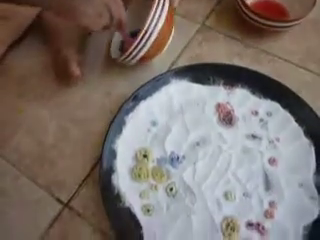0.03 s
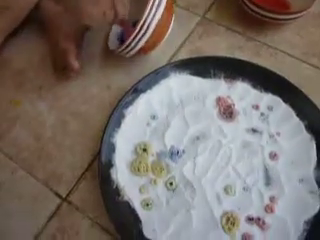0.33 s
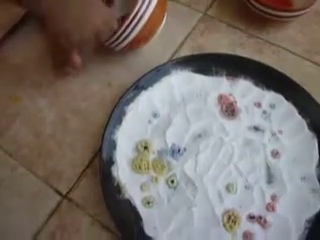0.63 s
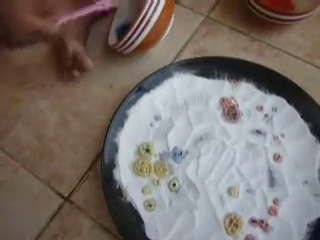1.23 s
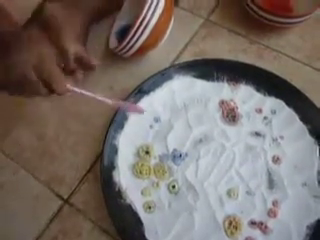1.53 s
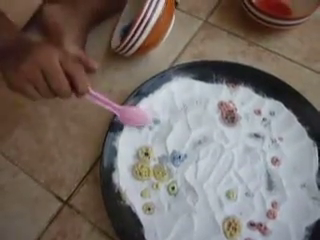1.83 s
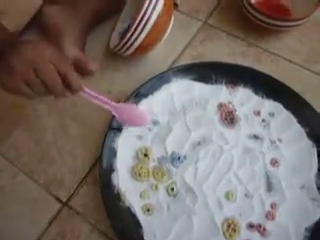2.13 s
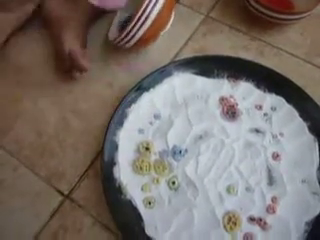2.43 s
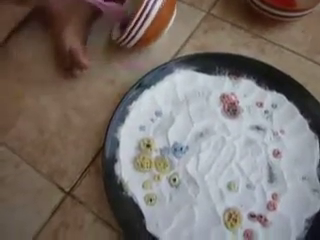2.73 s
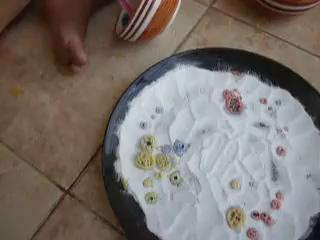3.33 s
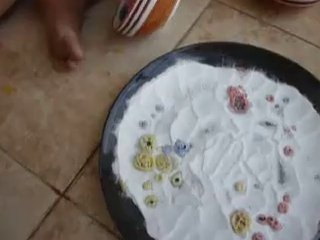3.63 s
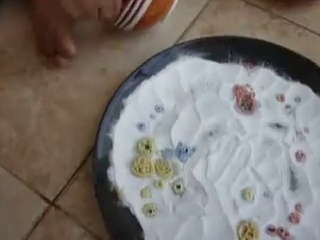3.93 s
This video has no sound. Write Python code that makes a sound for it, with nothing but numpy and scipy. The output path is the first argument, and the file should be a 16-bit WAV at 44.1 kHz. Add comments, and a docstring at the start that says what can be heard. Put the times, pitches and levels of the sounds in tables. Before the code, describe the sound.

A plastic spoon rubs faintly around a bowl of water at the start, with a few soft squeaks. Steady hiss, a wavering hum and dull room noise fill a quiet room, and two tiny clicks come near the end.

```python
"""Spoon and bowl in a quiet tiled room

A plastic spoon rubs faintly round a bowl of water, exciting its resonances; three soft squeaks
and a tiny tick follow. High hiss, a wavering hum and dull room noise run throughout; hiss and
room noise drop a little after 2.7 s. The mono recorder cuts three notches in the treble,
removes the top, clicks once and adds a DC offset."""
import sys
import numpy as np
from scipy.fft import rfft, irfft
from scipy.io import wavfile

SR = 44100
rng = np.random.default_rng(int(sys.argv[2]) if len(sys.argv) > 2 else 0)


def to_wav(sig):
    """Store sig (one row per channel, or 1-D mono) as 16-bit WAV at the path in sys.argv[1].

    Samples outside -1..1 are clipped; the rate is SR.
    """
    pcm = np.clip(np.atleast_2d(sig), -1, 1) * 32767
    pcm = np.round(pcm).astype(np.int16)
    wavfile.write(sys.argv[1], SR, pcm.T)  # frames by channels


N = 176400

# bowl resonances: f/Hz, width/Hz, relative level/dB
BOWL_MODES = [(530, 54, 2), (777, 89, 1.5), (1200, 97, -7.5), (1575, 100, -2.5), (1940, 97, -1.5),
              (2200, 160, -4), (2490, 190, -5), (3670, 240, -7.5)]
# squeaks: t/s, length/s, f/Hz, width/Hz, level/dB
SQUEAK_NOTES = [(0.449, 0.034, 900, 47, -49.5), (0.462, 0.042, 790, 44, -51), (1.54, 0.1, 1245, 12, -58)]
# hiss spectrum: f/Hz, relative level/dB
HISS_SPECTRUM = [(1000, -9.5), (2600, -12), (3700, -4.5), (5100, -1), (5900, 1), (6350, 2), (7000, -6.5),
                 (7350, -6), (7750, -15.5), (8400, -24), (8650, -33.5), (8900, -31)]
# hiss envelope: t/s, level/dB
HISS_ENVELOPE = [(0, -53.5), (.35, -54), (.58, -54.5), (.9, -53), (1.06, -54), (1.2, -52.8), (1.62, -54.5),
                 (1.7, -56.5), (1.85, -55), (2.3, -54.5), (2.64, -55), (2.75, -58), (3.28, -59.5),
                 (3.7, -59), (4, -58.5)]
# lower hum line: t/s, level/dB
HUM_LOW_ENVELOPE = [(0, -57), (.44, -57), (.52, -66), (0.619, -53), (.85, -77), (1.05, -55.5), (1.24, -61),
                    (1.4, -52.5), (1.76, -57), (1.95, -64.5), (2.28, -63), (2.951, -57), (4, -74.5)]
# upper hum line: t/s, level/dB
HUM_HIGH_ENVELOPE = [(0, -63.5), (1.1, -64), (1.6, -62), (1.76, -56), (1.88, -66.5), (2, -57), (2.2, -57),
                     (2.45, -67), (3.3, -67.5), (4, -68.5)]
# room noise spectrum: f/Hz, relative level/dB
ROOM_SPECTRUM = [(25, -25.5), (45, -23.5), (65, -7.5), (110, -6), (150, 1), (250, 0.5), (400, -4),
                 (560, -5.5), (950, -10.5), (1400, -12.5), (2400, -17.5), (4000, -32), (9000, -49)]
# room noise envelope: t/s, level/dB
ROOM_ENVELOPE = [(0, -50.5), (.45, -51), (.6, -50.5), (1.5, -50.5), (2.6, -51.5), (2.85, -53), (3.5, -53),
                 (4, -52.5)]
# recorder notches: f/Hz, width/Hz
TREBLE_NOTCHES = [(3010, 625), (4390, 1570), (5405, 290)]
# recorder DC offset: t/s, offset/full scale
DC_OFFSET = [(0, -.035), (2.699, -.035), (2.704, -.0295), (4, -.0295)]


def stir(start_s=0.013, peak_s=0.18, end_s=0.62, level_db=-53.5, rough_db=0.5):
    """Spoon friction drives the bowl's resonances; power follows the pressure."""
    spectrum = sum(undb(db) * resonance(hz, width_hz) * white_spectrum()
                   for hz, width_hz, db in BOWL_MODES)
    rub = unit(irfft(spectrum, N))
    pressure = curve([(start_s, 0), (peak_s, 1), (end_s, 0)])
    return rub * np.sqrt(pressure) * undb(level_db + rough_db * walk(49.6))


def squeaks():
    """Short, faint notes of unsteady pitch."""
    t, out = np.arange(N) / SR, np.zeros(N)
    for start_s, length_s, hz, width_hz, db in SQUEAK_NOTES:
        swell = np.sin(np.pi * np.clip((t - start_s) / length_s, 0, 1))
        out += undb(db) * swell * tone(hz + width_hz / 2 * walk(140))
    return out


def tick(start_s, gain_db, hz, width_hz):
    """An impulse rings one broad resonance for under 1 ms."""
    impulse = np.exp(-2j * np.pi * freqs() * start_s)
    return undb(gain_db) * irfft(impulse * resonance(hz, width_hz), N)


def hiss(waver_db=-0.08, ripple_db=2.64, ripple_points_per_khz=45.3):
    """High hiss, strongest near 6 kHz, with fine random spectral ripple."""
    ripple_index = freqs() / 1000 * ripple_points_per_khz
    ripple = np.interp(ripple_index, np.arange(2048), rng.standard_normal(2048))
    coloured = irfft(rfft(noise(HISS_SPECTRUM)) * undb(ripple_db * ripple), N)
    return unit(coloured) * undb(curve(HISS_ENVELOPE) + waver_db * walk(14))


def hum(low_hz=300.6, high_hz=319.5, wander_hz=2.37, flutter_depth=0.25):
    """Two close, faint lines that waver, swell and fade independently."""
    out = np.zeros(N)
    for hz, envelope in ((low_hz, HUM_LOW_ENVELOPE), (high_hz, HUM_HIGH_ENVELOPE)):
        line = tone(hz + wander_hz * walk(8))
        flutter = 1 + flutter_depth * walk(4.7)
        out += line * flutter * undb(curve(envelope))
    return out


def room(waver_db=-0.34):
    """Dull, even room noise."""
    return noise(ROOM_SPECTRUM) * undb(curve(ROOM_ENVELOPE) + waver_db * walk(22))


def undb(db):
    """Decibels to gain."""
    return 10 ** (np.asarray(db) / 20)


def unit(x):
    """Scale to rms 1."""
    return x / np.sqrt(np.mean(x ** 2) + 1e-30)


def curve(rows):
    """Linear interpolation of (t/s, value) rows."""
    return np.interp(np.arange(N) / SR, *np.array(rows).T)


def freqs():
    """Bin frequencies in Hz, floored at 1."""
    return np.maximum(np.arange(N // 2 + 1) * SR / N, 1)


def white_spectrum():
    """Spectrum of fresh white noise."""
    return rfft(rng.standard_normal(N))


def noise(points):
    """Noise shaped by (f/Hz, level/dB) points, rms 1."""
    hz, db = np.array(points).T
    gain = undb(np.interp(np.log(freqs()), np.log(hz), db))
    return unit(irfft(white_spectrum() * gain, N))


def resonance(hz, width_hz):
    """Second-order band-pass response, gain 1 at centre."""
    f = freqs()
    return 1 / (1 + 1j * (f * f - hz * hz) / (f * width_hz))


def walk(rate_hz):
    """Smooth random drift, rms 1."""
    return unit(irfft(white_spectrum() * np.exp(-(freqs() / rate_hz) ** 2), N))


def tone(hz):
    """Sine on a pitch curve, rms 1."""
    return np.sqrt(2) * np.sin(2 * np.pi * (np.cumsum(hz) / SR + rng.random()))


def lowpass(x, hz):
    """Steep cut above hz."""
    return irfft(rfft(x) / np.sqrt(1 + (freqs() / hz) ** 160), N)


def scene():
    """Mono sum at the microphone."""
    background = room() + hiss() + hum()
    room_tick = tick(start_s=3.8606, gain_db=-29.5, hz=6000, width_hz=1800)
    return (background + stir() + squeaks() + room_tick)[None]


def record(dry):
    """Recorder: treble notches, top cut, one brighter electrical click, DC offset."""
    notches = np.prod([1 - resonance(hz, width_hz) for hz, width_hz in TREBLE_NOTCHES], axis=0)
    narrow = lowpass(irfft(rfft(dry) * notches, N), hz=8800)
    click = tick(start_s=3.387, gain_db=-33.5, hz=3040, width_hz=2400)
    return lowpass(narrow + click, hz=15900) + curve(DC_OFFSET)


dry = scene()
out = record(dry)
to_wav(out)
```